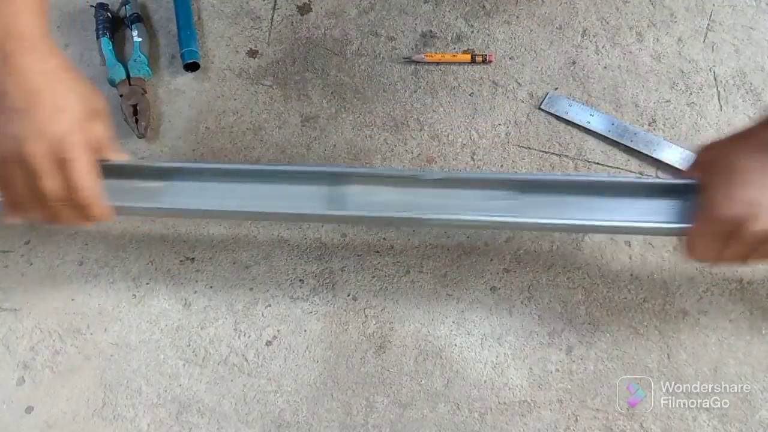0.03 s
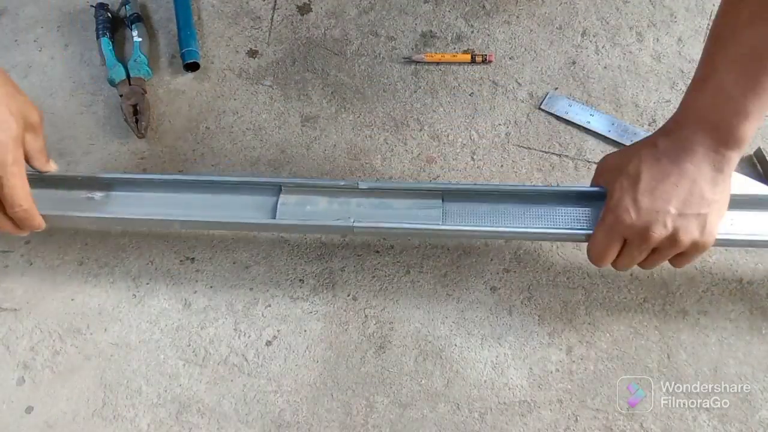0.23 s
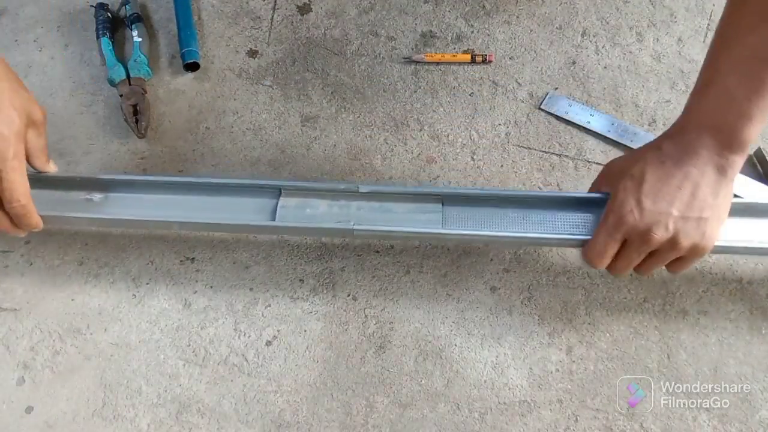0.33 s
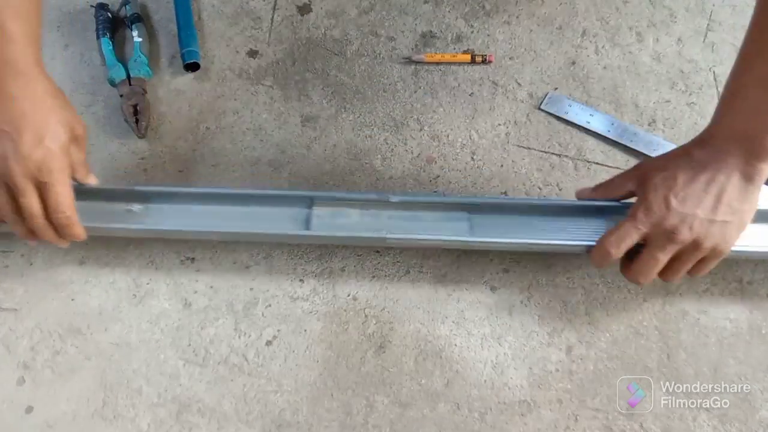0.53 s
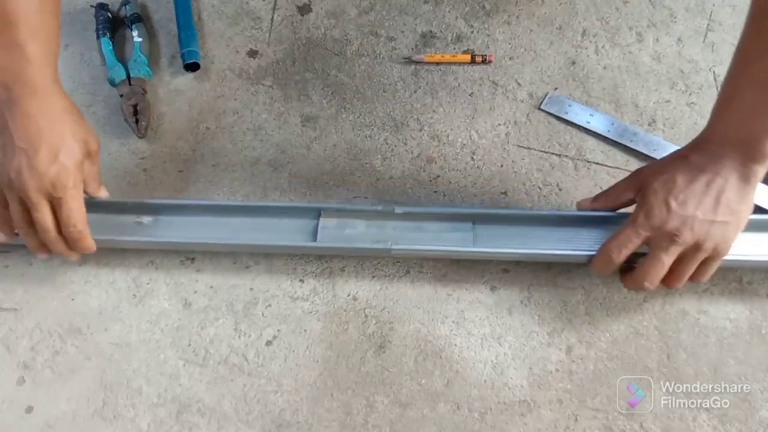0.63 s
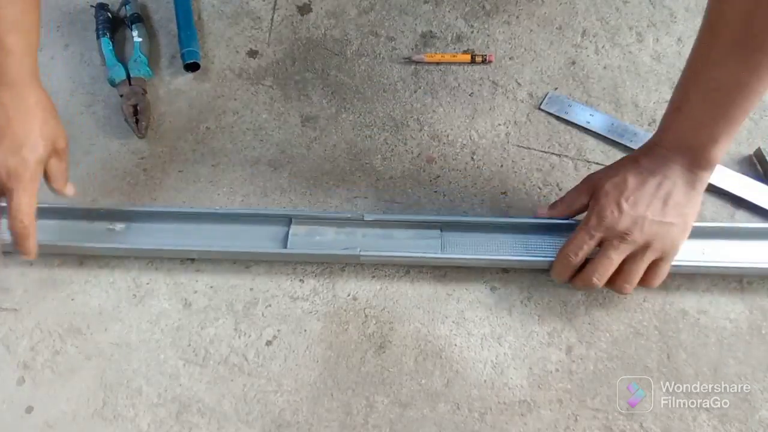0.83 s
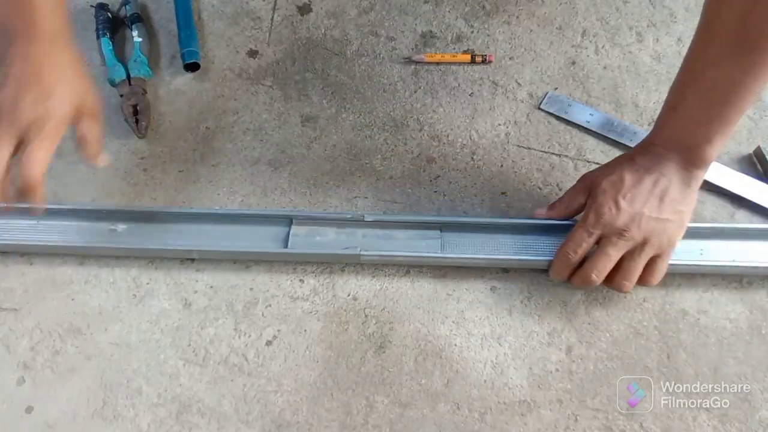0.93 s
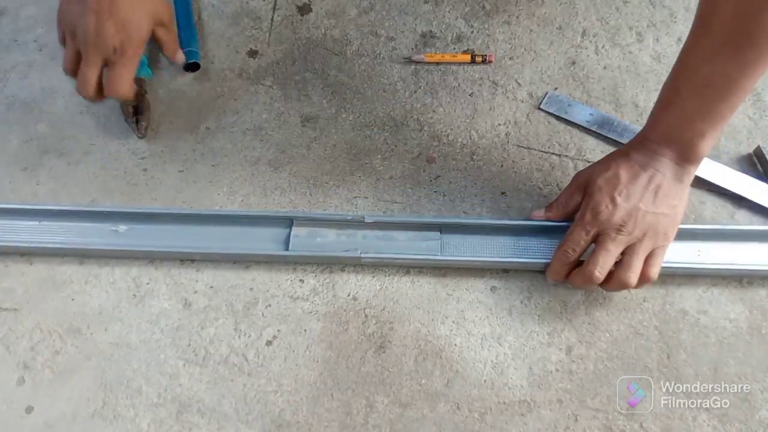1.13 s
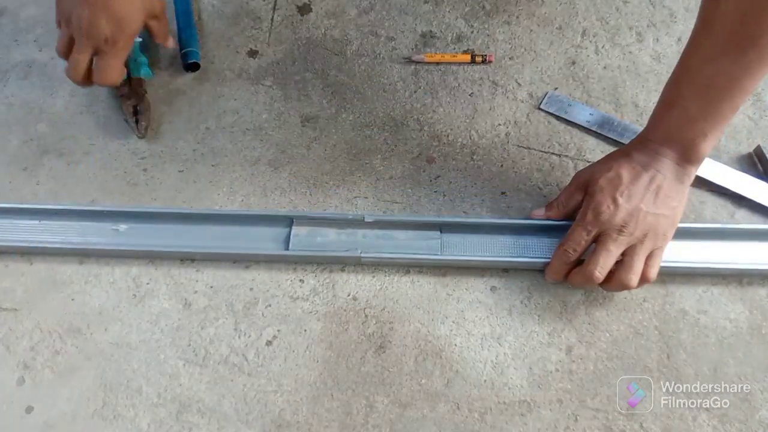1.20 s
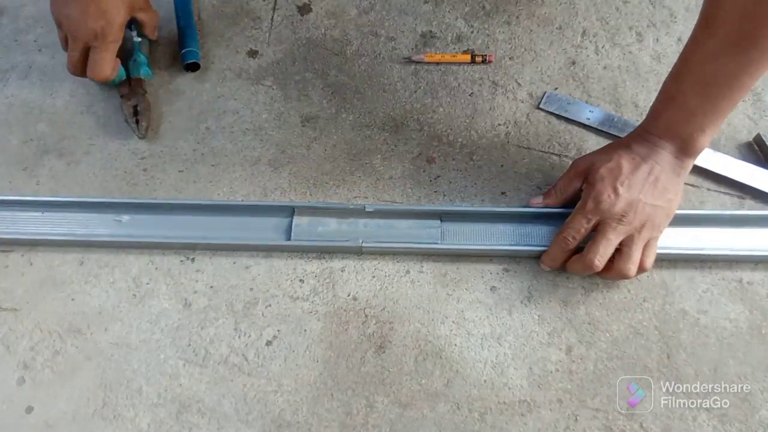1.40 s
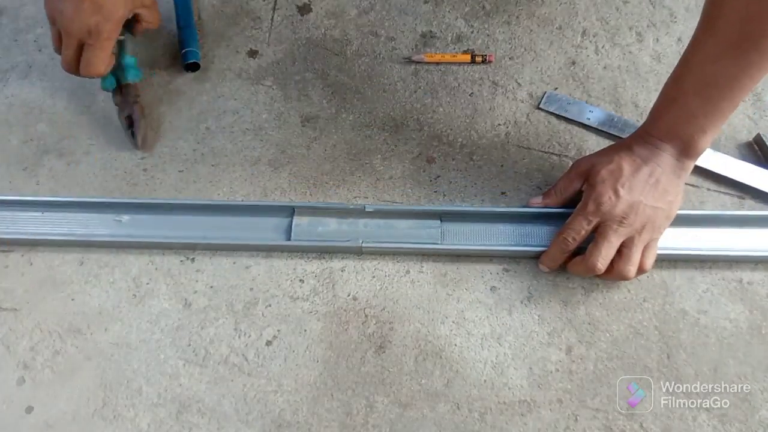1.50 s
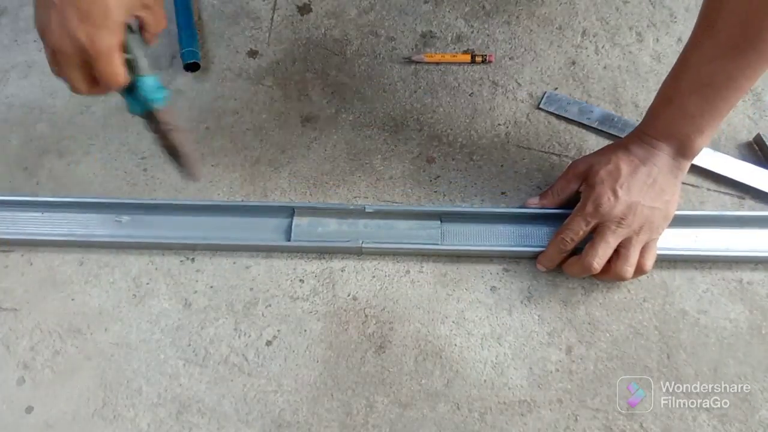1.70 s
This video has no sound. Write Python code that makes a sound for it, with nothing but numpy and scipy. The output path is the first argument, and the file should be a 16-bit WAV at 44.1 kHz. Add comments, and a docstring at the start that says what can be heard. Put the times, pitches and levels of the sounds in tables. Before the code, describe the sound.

A thin steel channel clanks onto a concrete floor at about 0.2 seconds, ringing and rocking softly as it settles. From 0.7 seconds it slides over grit, with sharp knocks near 0.9 and 1.0. Around 1.3 to 1.5 seconds pliers drag off the floor with a brighter rasp, a thin ring and small ticks. A few dull bumps follow until 1.7. Everything is close, in a hard, echoing room.

```python
"""A thin steel channel lands on a concrete workshop floor with a clank, its walls ringing, and rocks
softly. It is slid over the grit and knocked into place. A hand then drags a pair of pliers off the
floor: a brighter rasp with a thin ring, small ticks and, last, a few dull bumps.
The hard room rings on after the hits and scrapes; one close microphone hears it all."""
import sys
import numpy as np
from scipy import signal
from scipy.fft import rfft, irfft, next_fast_len
from scipy.io import wavfile
from scipy.ndimage import uniform_filter1d

SR = 44100
rng = np.random.default_rng(int(sys.argv[2]) if len(sys.argv) > 2 else 0)


def store_wav(level_fs):
    """Save 16-bit WAV to argv[1]."""
    pcm = np.round(np.clip(np.atleast_2d(level_fs), -1, 1) * 32767)
    wavfile.write(sys.argv[1], SR, pcm.T.astype(np.int16))


N = 77175
TIME = np.arange(N) / SR

# the channel hits the floor: t/s, hit level/dB, low, middle and high wall band/dB relative to the hit,
# brightness/(dB/octave), level of the modes/dB
KNOCKS = [(0.194, -69.5, -4, -1, -21, -4, -96), (0.2292, -19, 5, -16, -19, -0.47, -24),
          (0.279, -30, 1.5, -0.5, -7, -4, -39), (0.736, -37.5, -7.5, -2.5, -20, -1, -52),
          (0.9185, -21.5, -28, 1.5, -1, 2.5, -51), (0.9245, -28.5, -1, 8.5, -16, -1.5, -48),
          (0.947, -57, 17, 6, -12, 7, -67), (1.0195, -27.5, 0.5, -3, 0.5, -1, -30.5),
          (1.204, -38, 3.5, -3, -4, -4, -44.5), (1.3143, -38, -7, -23, -24, 2.5, -48),
          (1.356, -45, 7.5, -14, -6, -5, -45.5), (1.474, -36, -13.5, -12, -12.5, -2.5, -39)]
# EQ of a knock: f/Hz, level/dB
KNOCK_EQ = [(40, -46), (110, -19.5), (280, -14), (450, -8.5), (660, -8), (810, 2), (1050, -1.5),
            (1600, 3.5), (2800, -4.5), (4200, -3), (5800, -5), (7400, -12), (8400, -19.5), (13600, -34.5),
            (15000, -21.5)]
# crowds of modes in the channel's walls: f/Hz, width/Hz
WALL_BANDS = [(1265, 119), (2250, 690), (5250, 630)]
# the channel's clear tones: f/Hz, level/dB, t60/s
CHANNEL_MODES = [(767, -0.5, 0.61), (784, -4, 0.31), (799, -12, 0.76), (956, -38, 0.85), (1240, -4.5, 0.42),
                 (1274, -5.5, 0.3), (1316, 2, 0.26), (1365, -3, 0.75), (1446, -19, 0.61), (1655, -14, 0.81),
                 (1850, -4.5, 0.28), (1970, -4, 0.33), (2135, -1, 0.34), (2244, -8.5, 0.46),
                 (2400, -9.5, 0.69), (2933, -15, 0.96)]
# the channel rocks as it settles: t/s, level/dB
ROCKS = [(0.348, -21), (0.436, -37.5), (0.525, -42.5)]
# envelope of the channel sliding on concrete: t/s, level/dB
SLIDE_ENVELOPE = [(0.535, -65), (0.553, -43.5), (0.58, -90), (0.73, -69), (0.742, -40), (0.79, -33),
                  (0.835, -28), (0.87, -36.5), (0.91, -45), (1.0, -43), (1.06, -64), (1.11, -50),
                  (1.16, -43.5), (1.24, -39.5), (1.30, -41.5), (1.34, -54)]
# EQ of the slide: f/Hz, level/dB
SLIDE_EQ = [(60, -45), (200, -21), (500, -16.5), (780, 1.5), (1050, -7), (1290, 9.5), (1800, 3.5),
            (2300, 2.5), (3000, 0.5), (4400, -1.5), (5300, 3.5), (6100, -3.5), (7300, -5.5), (8300, -14.5),
            (13600, -28.5), (15000, -17)]
# envelope of the pliers dragging over the floor: t/s, level/dB
DRAG_ENVELOPE = [(1.298, -52), (1.31, -39.5), (1.322, -28), (1.345, -42.5), (1.375, -38), (1.387, -29.5),
                 (1.415, -29), (1.445, -33.5), (1.50, -36), (1.525, -54), (1.57, -64), (1.61, -87)]
# EQ of the drag: f/Hz, level/dB
DRAG_EQ = [(60, -48), (300, -12), (650, -10.5), (900, -4), (1100, 4.5), (1350, 9.5), (1800, -0.5),
           (2500, 3), (3900, 7), (4500, -17), (5250, 7), (6100, -15), (6800, -0.5), (8300, -17),
           (12000, -17.5), (13700, -32), (15000, -8.5)]
# the thin ring of the pliers: f/Hz, level/dB, t60/s
PLIERS_MODES = [(1514, 3, 0.15), (2428, 6, 0.26), (2970, 1, 0.17), (3690, -14, 0.13), (4070, 1, 0.28),
                (4900, 2, 0.095), (5570, 7, 0.21), (6600, -3, 0.067), (6900, -8, 0.1), (9540, 9.5, 0.15),
                (11100, -13.5, 0.086)]
# grit cracks and the pliers tick: t/s, level/dB, brightness/(dB/octave), ping f/Hz, relative ping level/dB
TICKS = [(0.7362, -48.5, -1, 4250, 1), (1.021, -21, -2, 5260, 3), (1.117, -36.5, 9, 11840, -18),
         (1.1537, -39.5, 4, 7000, -14), (1.267, -50, 8, 9500, -14.5), (1.3024, -41, 4, 9500, -12),
         (1.3135, -36, 7, 7100, -8), (1.383, -26.5, 1, 6750, -8), (1.4074, -22, 1, 9300, -12),
         (1.4579, -31, 1, 5160, 6), (1.5584, -49, -3, 4860, 12.5), (1.6756, -57, -3, 5210, 1),
         (1.685, -54, -5, 5000, -18.5)]
# EQ of a tick: f/Hz, level/dB
TICK_EQ = [(300, -26), (1500, -27), (3500, 2.5), (7000, 16), (8500, 2), (12000, 0), (13600, -8), (15000, 4)]
# bumps of hands and tool grips: t/s, level/dB, f/Hz
BUMPS = [(0.787, -52, 160), (0.804, -46.5, 162), (0.925, -36.5, 170), (1.021, -43, 550), (1.477, -44, 200),
         (1.494, -39.5, 180), (1.558, -32.5, 470), (1.664, -40, 375), (1.678, -41, 444), (1.685, -37, 450)]
# envelope of the hands rubbing: t/s, level/dB
RUB_ENVELOPE = [(0, -85), (0.1, -99), (0.16, -98), (0.22, -63.5), (0.39, -43), (0.55, -79), (0.74, -75),
                (0.81, -54), (0.88, -63), (1.08, -57.5), (1.3, -67), (1.5, -44), (1.61, -52), (1.65, -46),
                (1.70, -69), (1.75, -65)]
# EQ of the rub: f/Hz, level/dB
RUB_EQ = [(30, -22), (80, -17), (150, 2), (260, -5.5), (400, 5), (750, -9.5), (1400, -9), (3000, -34),
          (7000, -24), (15000, -68)]
# decay of steel and room ringing together: f/Hz, t60/s
WASH_T60 = [(100, 1.0), (400, 0.57), (1300, 0.53), (2500, 0.55), (5500, 0.42), (9000, 0.42), (15000, 0.24)]
# EQ of the room tone: f/Hz, level/dB
ROOM_TONE_EQ = [(25, -7), (60, -2), (130, 3), (400, -11.5), (1300, -8.5), (5500, -13), (8500, -25),
                (15000, -30)]
# the microphone's uneven treble: f/Hz, level/dB
MICROPHONE_EQ = [(7000, 0), (7600, 3), (8000, -1), (11000, 3), (12000, 6.5), (13400, 1), (13850, 11),
                 (14300, 5), (15300, 1)]


def channel_knocks(modes):
    """Each clank is a short rough contact that shakes the walls, then a dense wash with clear modes."""
    contact_s, attack_s = 0.0089, 0.00048
    progress = np.minimum(TIME / contact_s, 1)
    crack_envelope = (1 - np.exp(-TIME / attack_s)) * np.sqrt(1 - progress)
    swell = np.sin(np.pi * progress)
    out = np.zeros(N)
    for s, db, *walls_db, tilt_db, modes_db in KNOCKS:
        tail = amp(2.5) * wash()
        crack = amp(6.5) * radiated(crack_envelope * rng.standard_normal(N))
        hit = eq(crack + tail, KNOCK_EQ, tilt_db)
        for (hz, width_hz), wall_db in zip(WALL_BANDS, walls_db):
            shake = amp(5) * swell * np.sqrt(2) * np.sin(2 * np.pi * hz * TIME)
            ring = amp(-5.5) * band(tail * decay(t60=1), hz - width_hz / 2, hz + width_hz / 2)
            hit += amp(wall_db) * (shake + ring)
        add(out, s, amp(db) * hit + amp(modes_db) * modes)
    return out


def channel_modes():
    """The channel after one tap: clear tones and a shimmer of weak modes, the higher dying sooner."""
    low_hz, high_hz, count = 1363, 7700, 70
    shimmer = 0
    for place, strength in zip(rng.random(count), rng.standard_normal(count)):
        ratio = (high_hz / low_hz) ** place
        gain = strength * amp(-14 - 3.5 * np.log2(ratio))  # falls 3.5 dB an octave
        shimmer += gain * decay(t60=0.47 / ratio ** 0.086) * np.sin(2 * np.pi * low_hz * ratio * TIME)
    return radiated(tones(CHANNEL_MODES) + shimmer)


def channel_rocking(modes, rise_s=0.0041, soft_hz=980):
    """Soft contacts as the channel settles: mainly its lowest modes swell in."""
    out = np.zeros(N)
    for s, db in ROCKS:
        add(out, s, amp(db) * modes * (1 - np.exp(-TIME / rise_s)))
    return signal.sosfilt(signal.butter(2, soft_hz, fs=SR, output="sos"), out + 1e-18)


def scrapes(modes):
    """Grit makes the sliding channel sing faintly; the pliers rasp brighter, with a ring of their own."""
    sliding = grit() * envelope(SLIDE_ENVELOPE)
    dragging = grit() * envelope(DRAG_ENVELOPE)
    channel_ring = amp(-14) * resonate(sliding, modes)
    pliers_ring = amp(-10) * resonate(dragging, radiated(tones(PLIERS_MODES)))
    rasp = eq(sliding, SLIDE_EQ) + eq(dragging, DRAG_EQ)
    return channel_ring + pliers_ring + in_room(rasp, send_db=-2)


def grit(grains_per_s=4500, spread_db=3, flutter_db=2.5):
    """Catching on sand grains: dense clicks of uneven size, in clumps."""
    sizes = amp(spread_db * np.minimum(rng.exponential(1, N), 5)) * rng.choice([-1, 1], N)
    clumps = rms_one(uniform_filter1d(rng.standard_normal(N), size=300))
    catches = rng.random(N) < grains_per_s / SR
    return rms_one(sizes * catches * amp(flutter_db * clumps))


def ticks(half_width_hz=200):
    """Grit cracks and the pliers tick: bright snaps, each with a brief metallic ping."""
    out = np.zeros(N)
    for s, db, tilt_db, hz, ping_db in TICKS:
        crack = rng.standard_normal(N) * decay(t60=0.048)
        ping = amp(ping_db) * band(crack, hz - half_width_hz, hz + half_width_hz)
        add(out, s, amp(db) * (eq(crack, TICK_EQ, tilt_db) + ping))
    return in_room(out, send_db=-8.5)


def bumps():
    """Hands and tool grips make soft contact: short, dull thuds."""
    spread = 2 ** 0.74  # 0.74 octave to each side
    out = np.zeros(N)
    for s, db, hz in BUMPS:
        burst = rng.standard_normal(N) * decay(t60=0.056)
        add(out, s, amp(db) * band(burst, hz / spread, hz * spread))
    return in_room(out, send_db=-5)


def hand_rub():
    """Soft friction of the hands: a grainy, dark rustle."""
    return eq(grit() * envelope(RUB_ENVELOPE), RUB_EQ)


def wash(build_s=0.00065, build_cycles=1.4):
    """Dense ringing of steel and room: builds quickly, bass last, and dies band by band, treble first."""
    white, hz = rfft(rng.standard_normal(N)), np.fft.rfftfreq(N, 1 / SR)
    edges = np.geomspace(30, SR / 2, 14)
    tail = 0
    for low, high in zip(edges, edges[1:]):
        centre = np.sqrt(low * high)
        noise = irfft(white * (hz >= low) * (hz < high), N)
        build = 1 - np.exp(-TIME / (build_s + build_cycles / centre))
        tail += noise * build * decay(at_hz(WASH_T60, centre))
    return tail


def in_room(x, send_db):
    """The dry sound plus the hard room's reverb."""
    return x + amp(send_db) * resonate(x, wash())


def room_tone():
    """A faint, steady bed of dark noise."""
    return amp(-73) * eq(rng.standard_normal(N), ROOM_TONE_EQ)


def tones(modes):
    """Struck steel: one decaying sine for each mode."""
    return sum(amp(db) * decay(t60) * np.sin(2 * np.pi * hz * TIME) for hz, db, t60 in modes)


def radiated(x, low_cut_hz=486):
    """Roll off the bass that a narrow strip cannot radiate."""
    return signal.sosfilt(signal.butter(2, low_cut_hz, "high", fs=SR, output="sos"), x + 1e-18)


def resonate(x, response):
    """Drive a body with x; white noise keeps its power."""
    return signal.fftconvolve(x, response / np.linalg.norm(response))[:N]


def eq(x, points, tilt_db=0, tilt_from_hz=690):
    """EQ curve with an extra treble tilt in dB per octave; white noise keeps its power."""
    size = next_fast_len(2 * N, True) // 2 * 2
    hz = np.maximum(np.fft.rfftfreq(size, 1 / SR), 20)
    octaves = np.log2(np.maximum(hz / tilt_from_hz, 1))
    gain = rms_one(amp(at_hz(points, hz) + tilt_db * octaves))
    # minimum phase, so nothing rings ahead of a transient
    cepstrum = irfft(np.log(gain))
    cepstrum[1:size // 2] *= 2
    cepstrum[size // 2 + 1:] = 0
    return irfft(rfft(x, size) * np.exp(rfft(cepstrum)))[:N]


def band(x, low_hz, high_hz):
    """Band-pass; white noise keeps its power."""
    high_hz = min(high_hz, .48 * SR)
    sos = signal.butter(2, [low_hz, high_hz], "band", fs=SR, output="sos")
    return signal.sosfilt(sos, x + 1e-18) * np.sqrt(SR / 2 / (high_hz - low_hz))


def envelope(points):
    """Fader ride through (t/s, level/dB) points; silent before and after."""
    return amp(np.interp(TIME, *np.transpose(points), left=-np.inf, right=-np.inf))


def decay(t60):
    """Fade by 60 dB every t60 seconds."""
    return amp(-60 * TIME / t60)


def at_hz(points, hz):
    """Read a table on a log-frequency axis."""
    freqs, values = np.transpose(points)
    return np.interp(np.log(np.maximum(hz, 1)), np.log(freqs), values)


def amp(db):
    """Decibels to gain."""
    return 10 ** (np.asarray(db) / 20)


def rms_one(x):
    """Scale to rms 1."""
    return x / np.sqrt(np.mean(x ** 2) + 1e-20)


def add(out, s, x):
    """Mix x in from time s."""
    start = int(s * SR)
    out[start:] += x[:N - start]


def scene():
    """All layers over the room tone, the same left and right."""
    modes = channel_modes()
    bed = hand_rub() + room_tone()
    mono = channel_knocks(modes) + channel_rocking(modes) + scrapes(modes) + ticks() + bumps() + bed
    return np.array([mono, mono])


def record(dry):
    """The microphone colours the treble, the highest peaks are rounded and the top is cut."""
    cutoff_hz = 15450
    coloured = [eq(side, MICROPHONE_EQ) for side in dry]
    lowpass = signal.ellip(10, .2, 80, cutoff_hz, fs=SR, output="sos")
    return signal.sosfilt(lowpass, np.tanh(coloured))


dry = scene()
out = record(dry)
store_wav(out)
```